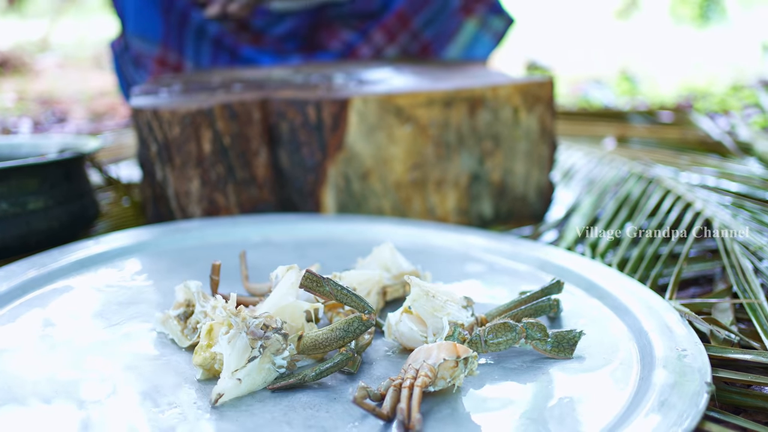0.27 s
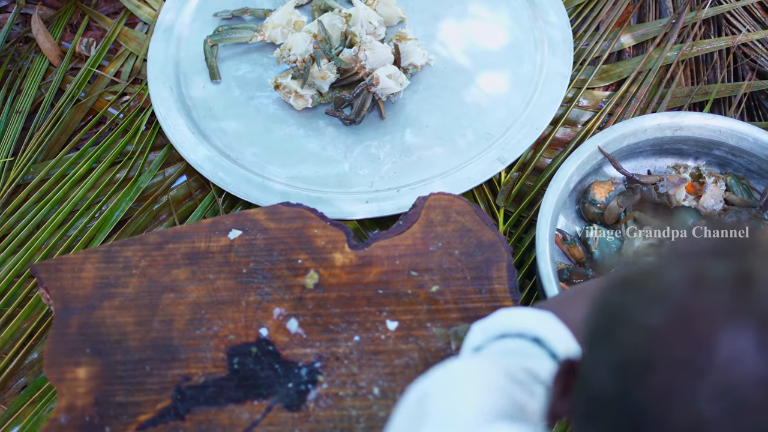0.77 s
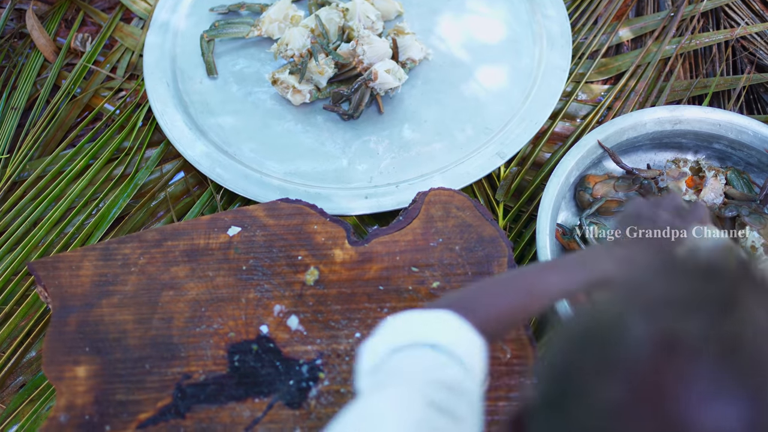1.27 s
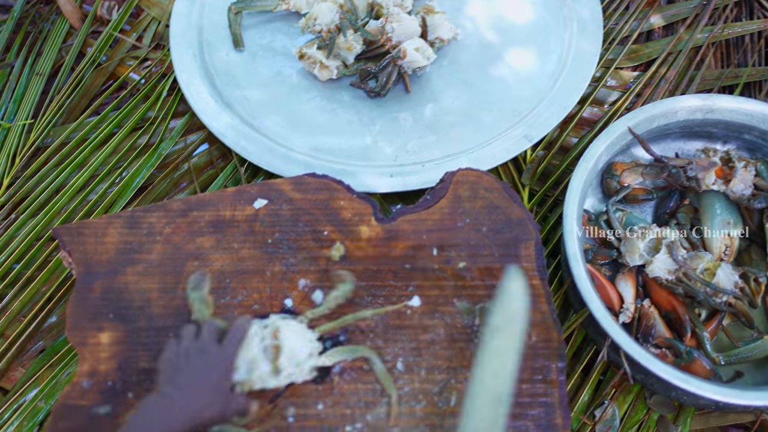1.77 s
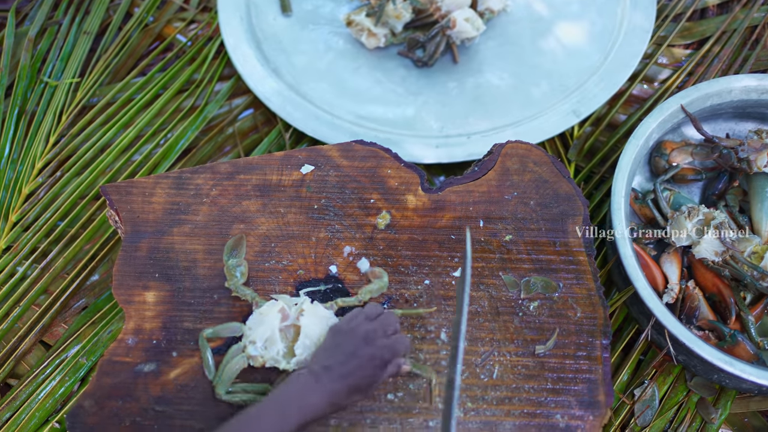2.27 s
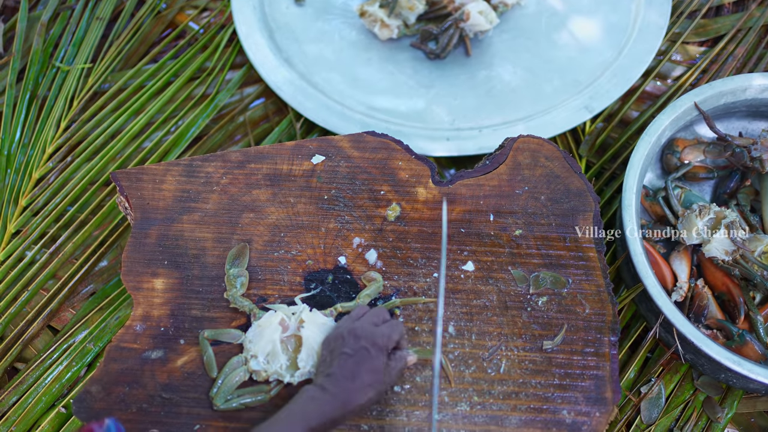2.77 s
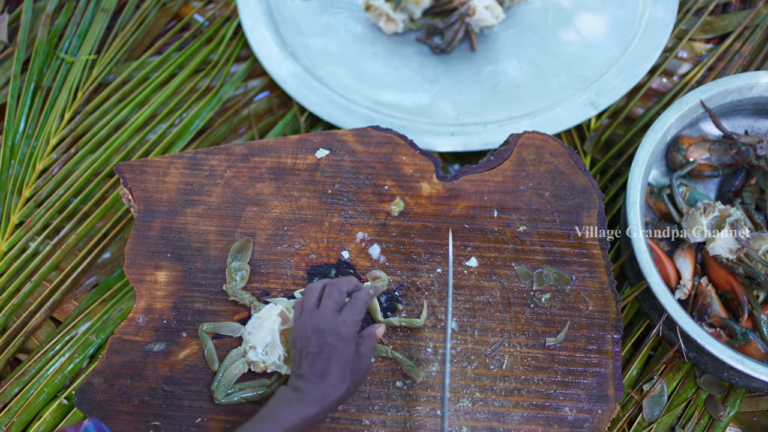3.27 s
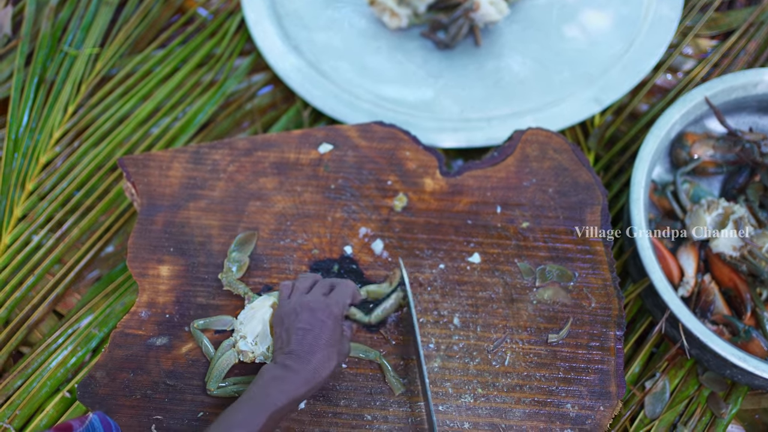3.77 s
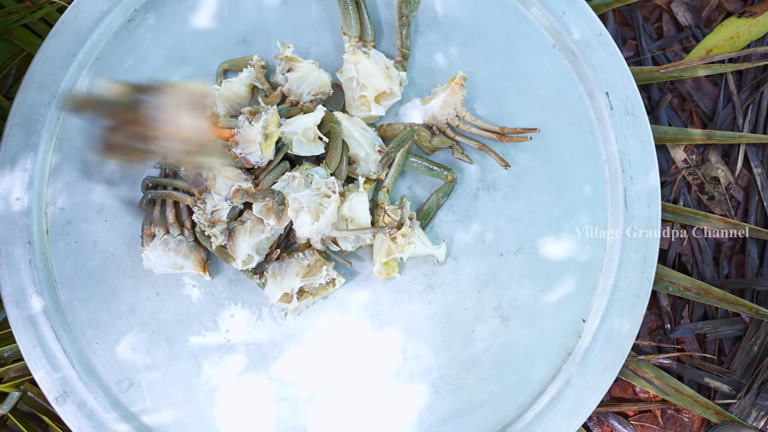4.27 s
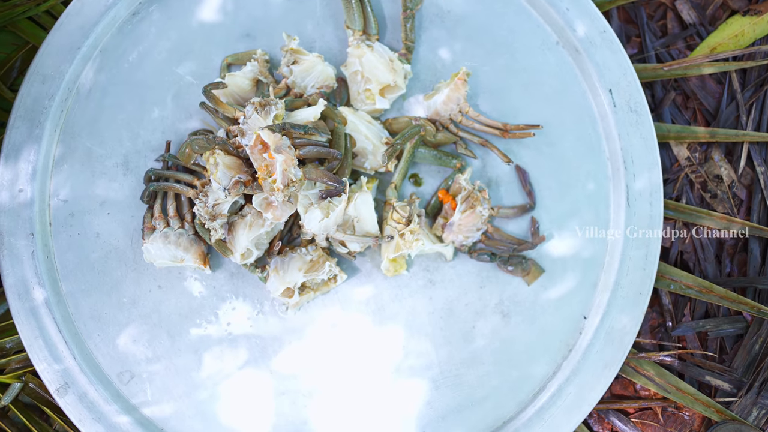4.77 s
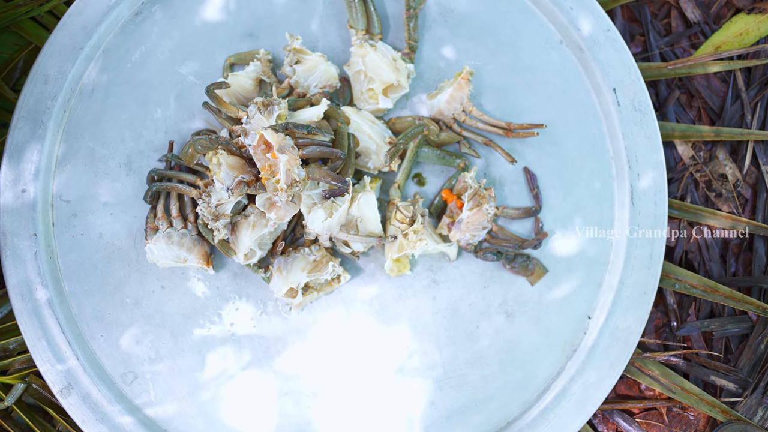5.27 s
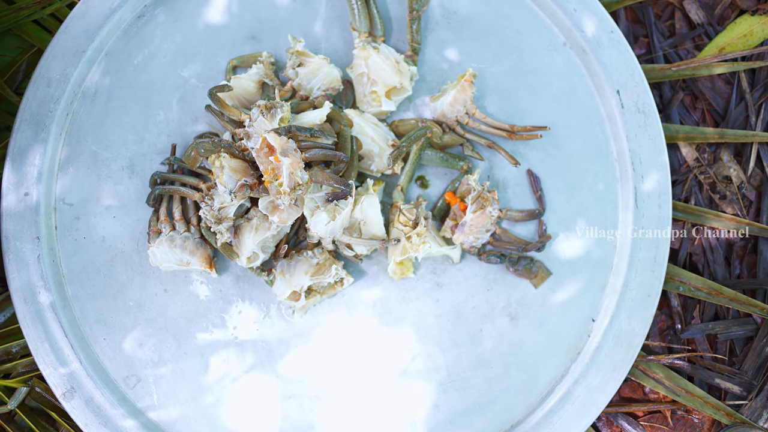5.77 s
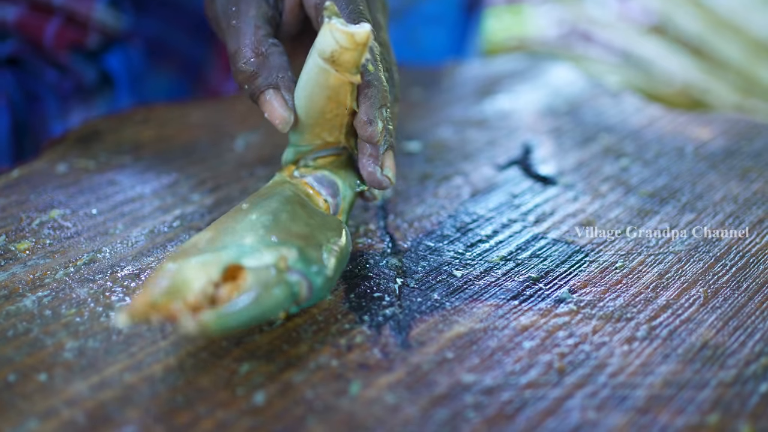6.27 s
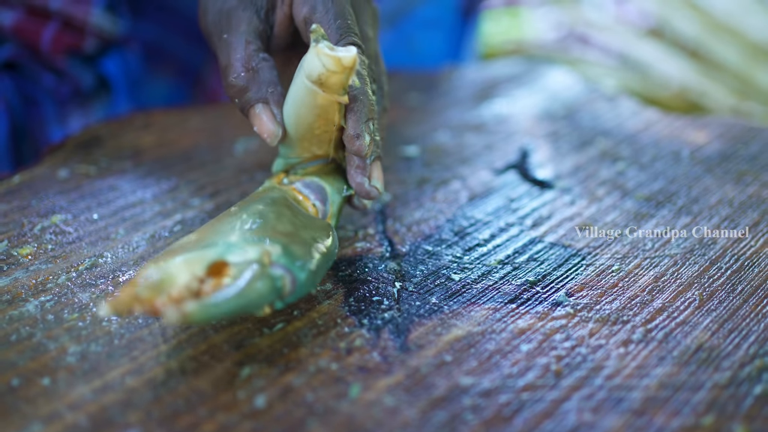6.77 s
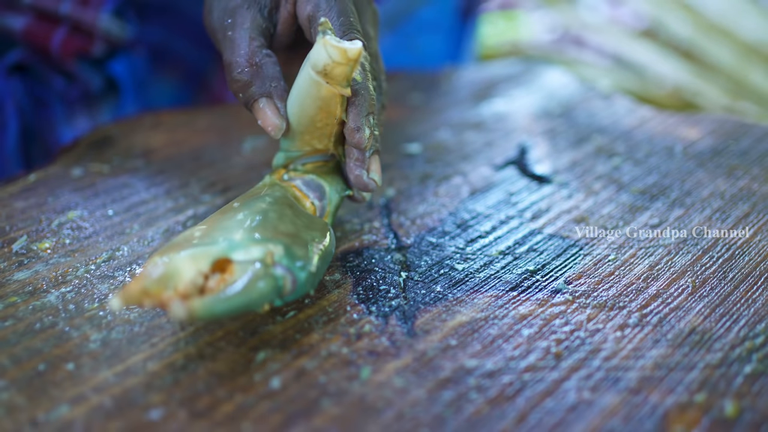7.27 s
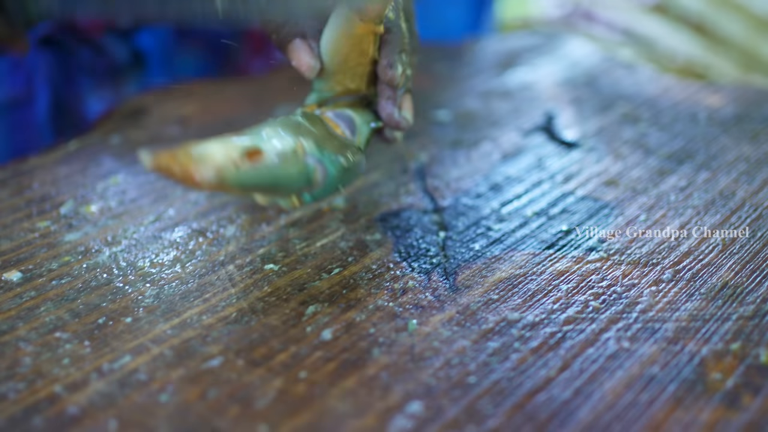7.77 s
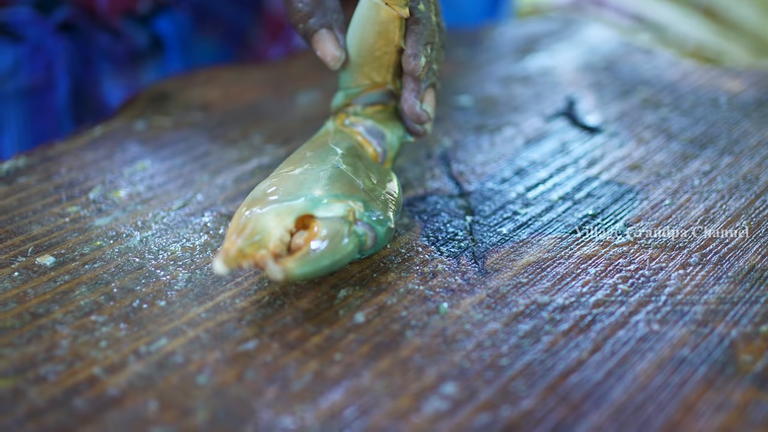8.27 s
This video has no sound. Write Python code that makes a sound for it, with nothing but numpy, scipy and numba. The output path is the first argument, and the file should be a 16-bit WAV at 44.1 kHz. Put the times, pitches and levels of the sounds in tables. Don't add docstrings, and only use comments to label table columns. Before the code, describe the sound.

Crab shells snap, knock and tumble onto a tray while sharp knife chops crack hard shell, echoing off trees in gusty open air.

```python
import sys
import numpy as np
from scipy import signal
from scipy.fft import rfft, irfft
from scipy.io import wavfile
from scipy.ndimage import uniform_filter1d
from numba import njit

SR = 44100
rng = np.random.default_rng(int(sys.argv[2]) if len(sys.argv) > 2 else 0)


def invert_db(x):
    u = np.asarray(x, float) / 20
    return 10 ** u


def dump(signal):
    limited = np.clip(np.atleast_2d(signal).T, -1, 1)
    pcm = np.round(limited * 32767).astype(np.int16)
    wavfile.write(sys.argv[1], SR, pcm)


N = 376173
T = np.arange(N) / SR


def unit(x):
    return x / np.sqrt(np.mean(x ** 2))


def colour(x, table):
    hz, db = np.transpose(table)
    f = np.maximum(np.fft.rfftfreq(len(x), 1 / SR), 1)
    gain = invert_db(np.interp(np.log(f), np.log(hz), db, -90, -90))
    return unit(irfft(rfft(x) * gain, len(x)))


def band(x, lo_hz, hi_hz):
    return signal.sosfilt(signal.butter(2, [lo_hz, min(hi_hz, .45 * SR)], "band", fs=SR, output="sos"), x)


def noise_band(lo_hz, hi_hz):
    return band(rng.standard_normal(N), lo_hz, hi_hz)


def walk(rate):
    k = int(SR / rate)
    held_levels = np.repeat(rng.standard_normal(N // k + 1), k)
    return unit(uniform_filter1d(uniform_filter1d(held_levels, k), k)[:N])


def steady(x, span_s):
    power = uniform_filter1d(x ** 2, int(span_s * SR))
    return unit(x / np.sqrt(power + .05 * np.mean(x ** 2)))


@njit
def add(out, s, hz, t60, size):
    for k in range(len(s)):
        start, z = int(s[k] * SR), size[k] + 0j
        p = np.exp(2j * np.pi * hz[k] / SR - np.log(1000) / (t60[k] * SR))
        for i in range(start, min(start + int(t60[k] * SR), len(out))):
            out[i] += z.imag
            z *= p


def rings(s, db, hz, t60, spread, smear_s, count):
    chance = rng.standard_normal((len(s), count, 3))
    chance[:, 0] = 0
    later, detune, sign = np.moveaxis(chance, 2, 0)
    weak = np.where(np.arange(count) > 0, 0.7 * np.sign(sign) / np.sqrt(count), 1)
    start_s = s[:, None] + smear_s * abs(later)
    pitch_hz = np.clip(hz[:, None] * np.exp(spread * detune), 50, .4 * SR)
    out = np.zeros(N)
    add(out, start_s.ravel(), pitch_hz.ravel(), np.repeat(t60, count), (invert_db(db)[:, None] * weak).ravel())
    return out


def grains(rate, lo_hz, hi_hz, cycles, scatter_db):
    s, pitch, size = rng.random((int(rate * N / SR), 3)).T
    hz, out = lo_hz * (hi_hz / lo_hz) ** pitch, np.zeros(N)
    add(out, s * N / SR, hz, cycles / hz, invert_db(-scatter_db * np.log(size + 1e-4)))
    return unit(out)


def resonate(x, dry_db, peaks):
    out = invert_db(dry_db) * x
    for hz, width, db in peaks:
        out = out + invert_db(db) * signal.lfilter(*signal.iirpeak(hz, hz / width, SR), x)
    return out


def hiss(table):
    return colour(rng.standard_normal(N), table) * invert_db(.4 * walk(2) + .4 * walk(15))


# start_s, hiss_level_db
SHOTS = [
    (0, -49.5),
    (.46, -49),
    (4.111, -43.5),
    (6.137, -40.5),
]
SHOT_START_S, HISS_DB = np.transpose(SHOTS)
SHOT = np.searchsorted(SHOT_START_S[1:], T)
# pitch_hz, level_db_per_hz
NEAR_LEAVES = [(120, 3), (200, 1), (329, -8.5), (368, -9.5), (468, -12), (552, -13), (702, -11),
               (1110, -10.5), (1200, -12.5), (1500, -10), (1670, -5.5), (2330, -12.5), (6200, -15),
               (10800, -28), (16500, -49.5)]
# pitch_hz, level_db_per_hz
FAR_WATER = [(120, -47.5), (200, -42), (300, -11.5), (426, -10.5), (522, -14), (652, -7.5), (702, -10.5),
             (860, -1.5), (1520, -0.5), (2210, -3), (4370, -3), (7740, -9), (9840, -16.5), (15000, -32.5),
             (16500, -50)]
# pitch_hz, level_db
MOTOR = [(107.7, -47), (161.5, -55.5), (209.9, -54)]
RUMBLE_DB = [-62, -81, -64.5, -59]


def field():
    motor = 0
    for hz, db in MOTOR:
        motor = motor + invert_db(db + 3.5 * walk(14)) * np.sqrt(2) * np.sin(2 * np.pi * hz * T)
    hum_hz, hum_db = 171.5, -60.5
    hum = invert_db(hum_db + 1.04 * walk(11)) * unit(noise_band(hum_hz - 9, hum_hz + 9)) * .7
    rumble = invert_db(np.array(RUMBLE_DB)[SHOT] + 1.57 * walk(2.02)) * unit(noise_band(89.5, 251))
    leaves = invert_db(HISS_DB[SHOT]) * np.where(SHOT < 2, hiss(NEAR_LEAVES), hiss(FAR_WATER))
    return leaves + rumble + np.where(SHOT == 0, motor, hum)


# loudest_s, mount_ring_db, buffeting_db, fade_20_db_s
GUSTS = [(.2, -46.5, -38, 0.6), (.61, -16.5, -20.5, 0.0851), (.85, -31, -38, .07), (1.09, -20, -25, 0.0729),
         (1.26, -17, -20.5, 0.11), (1.45, -31, -34, 0.08), (1.76, -25, -36, 0.14), (2.02, -34.5, -29, 0.23),
         (2.21, -35, -27.5, 0.29), (2.4, -25.5, -30, 0.1674), (2.52, -29.5, -24, 0.26),
         (2.62, -28.5, -31.5, 0.2864), (2.97, -31.5, -38, 0.07), (3.16, -22.5, -26.5, 0.0812),
         (3.35, -29, -45, 0.13), (4.1, -37, -37.5, 0.1548), (5.23, -41, -40.5, 0.09), (5.6, -52, -41, 0.53),
         (6.52, -37, -28, 0.2), (6.7, -31, -34, 0.1149), (6.98, -29, -34.5, 0.12), (7.27, -30, -29, 0.1361),
         (7.5, -44, -29, 0.2), (7.65, -31, -39, 0.03), (7.82, -27.5, -22.5, 0.2167),
         (8.05, -32, -30.5, 0.14), (8.32, -43, -44, 0.22), (8.52, -45, -33, 0.02)]


def gusts(peak_db, longer, calm_db):
    db = calm_db[SHOT]
    for (s, _, _, fade_s), peak in zip(GUSTS, peak_db):
        slope_s = longer * fade_s * np.where(T < s, 0.78, 1)
        db = np.maximum(db, peak - 20 * abs(T - s) / slope_s)
    return db


# mount_ring_db, buffeting_db
BREEZE_DB = [(-53.5, -49.5), (-45.5, -43), (-52.5, -45.5), (-48, -38.5)]
SWAY_DB = [-1, -1, 10, -1]


def wind():
    peaks, calm = np.transpose(GUSTS), np.transpose(BREEZE_DB)
    ring_db = gusts(peaks[1], 0.986, calm[0])
    buffet_db = gusts(peaks[2], 1.705, calm[1])
    ring_hz = 64 * (1 + .08 * walk(11))
    ring = np.sin(2 * np.pi * np.cumsum(ring_hz) / SR) * np.sqrt(2)
    share = np.clip((ring_db + 40) / 14, 0, .25) * (T < SHOT_START_S[2])
    mount = np.sqrt(share) * ring + np.sqrt(1 - share) * steady(noise_band(44, 72), .08)
    spray = invert_db(-27) * unit(noise_band(63, 206))
    buffet = invert_db(2.5 * walk(7.7)) * steady(noise_band(16, 40), .1)
    sway = invert_db(np.array(SWAY_DB)[SHOT] + 1.5 * walk(4)) * steady(noise_band(6, 16), .25)
    return invert_db(ring_db - 1.8) * (mount + spray) + invert_db(buffet_db - 7) * (buffet + sway)


# loudest_s, peak_db, pitch_hz, swell_s, fade_s
ROCKS = [
    (1.242, -11, 315, .014, .008),
    (1.273, -18, 400, .003, .006),
    (1.292, -22, 290, .01, .008),
    (1.3, -25, 200, .025, .02),
    (1.312, -23, 420, .002, .008),
]


def bowl():
    sag_per_s, upper_db = 4, -13
    out = np.zeros(N)
    for s, db, hz, swell_s, fade_s in ROCKS:
        on = slice(int((s - .05) * SR), int((s + .05) * SR))
        t = T[on] - s
        turn = 2 * np.pi * hz * t * (1 - sag_per_s * t)
        shape = np.exp(-(t / np.where(t < 0, swell_s, fade_s)) ** 2)
        out[on] += invert_db(db) * (np.cos(turn) + invert_db(upper_db) * np.cos(2.1 * turn)) * shape
    return out


# loudest_s, swell_s, settle_s, crackle_db, body_over_crackle_db
RUSTLE = [(.005, 0.00725, 0.0738, -22.5, 12), (.493, 0.0263, .04, -50, 26), (.64, 0.035, .12, -42, 7),
          (.715, .012, .04, -40, 6), (.762, .012, .015, -28, -10), (.976, .008, .012, -34, -5),
          (.77, 0.205, 0.196, -37.5, 5.5), (1, 0.07, 0.067, -39, 15), (1.059, .03, 0.169, -25, 4),
          (1.13, .01, .09, -38, 8), (1.198, .02, .015, -36, 8), (1.27, 0.03, 0.09, -55, 27),
          (1.62, 0.104, 0.156, -47, -6), (1.814, 0.0323, .16, -37, -7), (3.295, .02, .03, -42, -12),
          (3.33, .015, .14, -32, -19), (3.41, .03, .09, -43, -19), (4.384, .008, .1, -17, 0),
          (4.516, 0.0029, 0.0606, -33, 10), (4.392, .015, .02, -21, 6), (4.608, .004, .1, -29, 14),
          (4.67, .06, .11, -27, 12), (4.797, 0.00187, .05, -35, 12), (5.722, 0.0031, 0.08, -38, 8),
          (5.825, .06, 0.037, -36, 12), (5.869, 0.00216, .01, -30, -9), (5.889, 0.0114, 0.117, -41.5, 17.5),
          (5.98, .004, .03, -30, 0), (6.005, .01, .08, -27, 13), (6.075, .03, .04, -29, 15),
          (6.042, .01, .08, -28, 9), (6.1, .09, .07, -24, 11), (8.2, 0.1, 0.19, -44, 2)]
# pitch_hz, level_db_per_hz
CRACKLE = [(530, -49.5), (900, 1.5), (2350, -0.5), (4070, -1.5), (5070, -11), (5940, -8), (11000, -22),
           (15300, -42), (16500, -52)]


def rustle():
    bright = signal.lfilter([1, -.8], [1], grains(3000, 867.9, 17550, 38.6, 2.1))
    jolts_db = 4.2 * walk(160) + 1.2 * walk(35)
    grit = 0
    for hz in 850 * 1.5 ** np.arange(7):
        grit = grit + invert_db(jolts_db + 3.5 * walk(60)) * noise_band(hz, 1.5 * hz)
    crackle = steady(colour(1.15 * unit(bright) + unit(grit), CRACKLE), .03)
    body = steady(band(grains(500, 334.9, 1117.4, 27.2, 1.36), 308, 1490), .04)
    edge_db = 18
    out = np.zeros(N)
    for s, swell_s, settle_s, db, body_db in RUSTLE:
        on = slice(max(int((s - swell_s) * SR), 0), int((s + 1.4 * settle_s) * SR))
        shape_db = -edge_db * abs(T[on] - s) / np.where(T[on] < s, swell_s, settle_s)
        out[on] += invert_db(db + shape_db) * (invert_db(-2.5) * crackle[on] + invert_db(body_db - 10.5) * body[on])
    return out


# start_s, peak_db, pitch_hz
SNAPS = [(.6288, -28, 1230), (.6468, -29.5, 1313), (.7192, -24, 1367), (.8997, -30, 3180),
         (1.091, -18, 3600), (1.1088, -18, 3280), (1.1198, -17.5, 1534), (1.2036, -29, 1700),
         (3.3165, -23, 4100), (3.327, -21, 5200), (4.382, -16, 8500), (4.6225, -22, 5000), (4.7, -24, 7300),
         (1.066, -20, 3700), (1.13, -24, 4100), (5.9805, -27, 4400), (5.9808, -27, 5950),
         (6.041, -16, 5950), (6.097, -20, 5900), (1.6209, -38, 3510), (4.3852, -9, 3624),
         (4.3913, -6.5, 2785), (4.4034, -22, 1390), (4.4222, -15.5, 1503), (4.4369, -12, 3500),
         (4.634, -13, 1600), (4.649, -21.5, 5560), (4.6535, -14, 1670), (4.686, -14.5, 2856),
         (4.7167, -15, 1907), (4.7991, -21.5, 1158), (5.868, -15, 1700), (5.9796, -24.5, 1575),
         (6.005, -16, 1974), (6.028, -18, 4150), (6.0397, -5, 2704), (4.3805, -12, 3700),
         (7.8676, -4, 1050), (7.8969, -15, 3500), (7.8695, -14, 1500), (7.8715, -13, 3000),
         (1.8198, -19, 3800), (.707, -30, 1700), (.82, -31, 3500), (.857, -30, 1900), (5.8682, -17, 3300),
         (1.075, -22, 3500), (1.05, -24, 3600)]
# start_s, peak_db, pitch_hz
TAPS = [(0.0213, -11.5, 1282), (0.0427, -17, 1254), (.754, -24.5, 4260), (0.7626, -17.5, 3776),
        (1.0444, -22.5, 1480), (1.063, -14.5, 1242), (1.8196, -11.5, 2503), (2.529, -32, 2660),
        (3.3162, -5.5, 2074), (3.3268, -7, 1960), (3.3331, -15, 2066), (3.376, -33, 1340),
        (3.3948, -19, 1785), (3.4063, -27, 1546), (3.4898, -34, 2030), (4.5425, -11, 1210),
        (4.6055, -14.5, 1243), (4.6207, -14, 1150), (5.7226, -26.5, 1647), (5.824, -22.5, 1310),
        (6.0725, -27.5, 1190), (6.0963, -9, 2840), (6.1022, -11, 2270), (6.1095, -14, 1300),
        (6.124, -20, 1204), (3.3235, -17, 2050), (3.3395, -22, 2300), (4.525, -24, 2800),
        (4.539, -24, 2900), (1.848, -30, 2200), (8.2756, -27.5, 2010)]
# start_s, peak_db
FLICKS = [(.793, -37.5), (0.8194, -44.5), (0.8564, -33.5), (1.5862, -37), (1.607, -36), (2.6526, -33.5),
          (4.7, -32), (4.799, -34), (1.8205, -33), (1.187, -36), (6.6791, -25.5)]
TREBLE_DB = [-12, -24.5, 2]


def ticks():
    flick_hz = 1700
    kinds = [SNAPS, TAPS, [(s, db, flick_hz) for s, db in FLICKS]]
    s, db, hz = np.vstack(kinds).T
    top_db = np.repeat(TREBLE_DB, [len(rows) for rows in kinds])
    sharp = top_db > -15
    spike = rings(s, db - np.where(sharp, 2, 9), 1.78 * hz, 1.37 / hz, 0.324, 0.00046, count=3)
    ring = rings(s, db, hz, np.where(sharp, 11, 15) / hz + 0.004, 0.167, 0.0011702, count=7)
    top_hz = np.where(top_db > 0, 11000, 8500)
    top = rings(s, db + top_db + 5.5, top_hz, 0 * s + 0.0019, 0.248, .001, count=6)
    grit = invert_db(-36) * rng.standard_normal(1500) * np.exp(-T[:1500] / 0.01074)
    tail = band(signal.fftconvolve(ring + top, grit)[:N], 550, 14200)
    return band(band(spike + ring + top, 600, 13000), 600, 19000) + tail


# [(pitch_hz, width_hz, boost_db)]
HOLDERS = [
    (0, -5, [(1000, 300, -4), (1450, 300, -5), (1870, 300, -4), (3550, 450, -3), (4200, 350, -5), (5700, 700, -5), (7700, 900, -4), (12000, 5000, -5)]),
    (1.5, -10, [(1020, 300, 1), (1800, 300, -4), (2150, 400, -2), (2700, 400, -6), (4080, 250, -9), (5300, 900, -8), (11000, 5000, -4)]),
    (4.111, -4, [(1300, 500, -5), (2750, 350, -5), (3700, 450, -4), (5810, 500, -6), (7500, 700, -4), (12000, 5000, -4)]),
    (5.3, -5, [(1030, 300, -4), (1480, 250, -4), (1900, 300, -4), (2400, 300, -4), (2870, 350, -5), (4180, 450, -2), (5970, 350, -1), (11000, 5000, -6)]),
]


def held(x):
    edges_s = [s for s, _, _ in HOLDERS[1:]] + [SHOT_START_S[3], 6.3]
    parts = np.split(x, [int(s * SR) for s in edges_s])
    coloured = [resonate(p, db, peaks) for p, (_, db, peaks) in zip(parts, HOLDERS)]
    return np.concatenate(coloured + [0 * parts[-2], parts[-1]])


# start_s, peak_db, pitch_hz
SPIKES = [(1.0655, -8, 1300), (.9745, -26, 3300), (3.3158, -8, 1900), (3.3268, -11, 1700),
          (3.3338, -14, 1500), (3.4055, -20, 2400), (4.6065, -5, 900), (4.6222, -8, 1100),
          (4.6338, -9, 1800), (4.6542, -6, 1200), (4.6862, -8, 1500), (4.4545, -16, 1800),
          (5.8675, -7, 2000), (6.0962, -6, 2200), (6.1005, -7, 1500), (7.2398, -6, 1200),
          (1.8195, -12, 1600), (6.6793, -16, 600)]


def spikes():
    out = 0
    for bright, low_hz in enumerate([400, 800]):
        s, db, hz = np.transpose([row for row in SPIKES if (row[2] > 1450) == bright])
        swing = rings(s, db + 5, hz, 3.5 / hz, .1, 0, count=1)
        out = out + band(swing, low_hz, 12000)
    return out


# start_s, peak_db
TRAY = [(4.3875, -11), (4.4005, -4), (4.414, -7), (4.4257, -10), (4.4384, -6), (4.457, -6), (4.4965, -22.5),
        (4.5174, -18), (4.5429, -21), (4.6071, -5), (4.6226, -14.5), (4.6408, -18.5), (4.687, -.5),
        (4.6997, -4), (4.7164, -10), (4.7287, -12), (4.7777, -23.5)]
# start_s, peak_db, pitch_hz
HEAP = [(0.02, -8.5, 523), (.039, -11, 925), (.4749, -26, 420), (.4932, -16, 650), (.4945, -20, 420),
        (0.82, -22, 795), (0.9435, -16, 432), (1.0335, -4.5, 649), (1.041, -6, 440), (1.0659, -5, 646),
        (1.086, -13, 540), (1.13, -23, 426), (1.2039, -14, 380), (4.6065, -6, 700), (4.634, -9.5, 505),
        (4.6544, -3, 600), (4.7981, -10, 896), (5.7244, -19, 600), (5.74, -26, 630), (5.755, -26, 610),
        (5.77, -28, 650), (5.79, -27, 620), (5.808, -24, 650), (5.845, -26, 640), (5.885, -25, 640),
        (5.92, -29, 620), (5.8224, -14, 658), (5.867, -13, 1026), (5.8933, -22.5, 970), (5.9827, -19, 900),
        (5.9939, -23.5, 740), (6.004, -14.5, 471), (6.0465, -11.5, 400), (6.0748, -18, 560),
        (6.02, -17, 400), (6.064, -16, 380), (5.83, -24, 420), (5.87, -22, 400), (5.9, -26, 400),
        (6.1006, -11, 389), (6.1075, -8, 560), (6.1219, -14.5, 461)]
# start_s, peak_db, pitch_hz
BLOCK = [(8.1641, -25, 360), (8.1958, -24, 352), (1.8192, -10.5, 1088), (3.0096, -15, 497),
         (3.3156, -13, 1020), (3.327, -12, 1000), (3.394, -24, 1000), (7.703, -16, 1100), (3.7375, -3, 410),
         (7.128, -8, 1500), (3.334, -17, 1050), (3.7519, -14, 482), (6.68, -13, 347), (7.2399, -4, 620),
         (7.245, -6, 900), (3.011, -22, 1800), (7.8677, 2, 760), (7.8705, -7, 540), (7.696, -13, 420),
         (3.7385, -7, 560), (1.82, -24, 250), (6.6805, -20, 480), (7.9053, -25, 450)]
THIN_HZ = [185, 340, 620]
BRIGHT_HZ = [590, 990]


def knocks():
    tray_hz, contact_s = 310.9, .0004
    kinds = [[(s, db, tray_hz) for s, db in TRAY], HEAP, BLOCK]
    rows = np.vstack(kinds)
    traits = np.repeat([[13, 14, 6.5], [0, -3, -0.5]], [len(k) for k in kinds], axis=1)
    out = 0
    for bright, low_hz in enumerate(THIN_HZ):
        mine = np.searchsorted(BRIGHT_HZ, rows[:, 2]) == bright
        s, db, hz = rows[mine].T
        cycles, soft_db = traits[:, mine]
        contact = rings(s, db + soft_db - 1.5, 1.966 * hz, 2.34 / hz, .1, 0.00034, count=1)
        ring = rings(s, db - 4.5, hz, cycles / hz, 0.17, 0.002, count=4)
        rounded = signal.lfilter(*signal.butter(2, 1 / contact_s, fs=SR), contact + ring)
        out = out + band(band(rounded, low_hz, 9000), .92 * low_hz, 12000)
    return out * ((T < SHOT_START_S[3]) | (T > 6.3))


# start_s, level_db, pitch_hz, die_60_db_s
STEEL = [
    (2.992, -31, 4440, 0.22),
    (2.992, -37, 7725, 0.2),
    (3.74, -33, 1093, 0.247),
    (3.739, -47.5, 4810, .25),
    (3.74, -39, 6154, 0.21),
    (3.74, -41, 7730, 0.2),
]
# start_s, peak_db, pitch_hz, die_60_db_s
BLADE = [
    (1.642, -38, 2009, 0.122),
    (1.659, -40, 1932, 0.105),
    (3.866, -31, 1851, 0.06),
    (3.885, -32.5, 1863, 0.099),
    (3.899, -31.5, 1870, 0.104),
]


def blade():
    after_chops = rings(*np.transpose(STEEL), 0.0121, 0.029, count=4)
    return after_chops + rings(*np.transpose(BLADE), 0.0262, 0.001304, count=2)


# start_s, peak_db, block_thud_below_peak_db, echo_below_peak_db
CHOPS = [
    (2.987, -3.5, -9, -28),
    (3.7338, -4.5, -6, -28.5),
    (6.4326, -1.5, -39, -17.5),
    (7.127, -2, -30, -18),
    (7.6944, -1, -27, -22.5),
]
# pitch_hz, width_hz, level_db
CRACKS = [
    [(1510, 170, 0), (1960, 200, 0), (3760, 96, -8), (4460, 120, -9), (5820, 170, -11), (6910, 100, -12)],
    [(1040, 170, 0), (2190, 180, -9), (3780, 310, -12), (5640, 180, -18), (6170, 170, -20),
     (7600, 170, -17), (8260, 200, -22)],
    [(1510, 75, -10), (2000, 120, 0), (2700, 150, -5), (3590, 110, -4), (5370, 180, -13), (6310, 270, -16),
     (7470, 180, -10), (8000, 230, -19)],
    [(845, 260, -2), (2000, 120, -7), (2750, 140, 0), (3660, 110, -2), (4670, 270, -8), (7200, 150, -13),
     (7750, 82, -14), (8020, 130, -12)],
    [(738, 140, -1), (1880, 130, 0), (2940, 160, -1), (3300, 160, 0), (5860, 140, -8), (7100, 160, -16),
     (7710, 96, -12), (8310, 130, -8)],
]
# pitch_hz, level_db_per_hz
ECHO = [
    [(240, -29), (400, -5), (505, -4.5), (658, -13.5), (986, -2.5), (4530, -5.5), (12700, -22),
     (15500, -35), (16500, -59)],
    [(240, -55), (400, -24.5), (1210, -11), (1810, -6), (2320, -8.5), (4330, -1.5), (7820, -10),
     (13300, -27.5), (15700, -34), (16500, -65)],
]
ECHO_DELAY_S = [0.0435, 0.06306]
SWING_DB = [-39, -60]
THROUGH_S = [.0033, .0012]
CRACK_LOW_HZ = [170, 480]


def chops():
    out, t = np.zeros(N), T[:int(.6 * SR)]
    swing = int(.027 * SR)
    for (s, db, thud_db, echo_db), modes in zip(CHOPS, CRACKS):
        claw = int(s > 5)
        delay, noise = ECHO_DELAY_S[claw], rng.standard_normal((2, len(t)))
        hz, _, mode_db = np.transpose(modes)[..., None]
        since = t - THROUGH_S[claw] * (hz < 1200)
        tones = np.sin(2 * np.pi * (hz * t + rng.random(hz.shape)))
        sung = (invert_db(mode_db) * tones * (since > 0) * np.exp(-abs(since) / .0018)).sum(axis=0)
        splinter = unit(band(noise[0], 600, 9000) + .3 * noise[0])
        splinter = invert_db(.7) * splinter * np.exp(-(t / 0.0024) ** 2)
        blow = invert_db(db - 3.5) * np.tanh(3.2 * (sung + splinter))
        since = np.maximum(t - .0033, 0)
        block = invert_db(db + thud_db + 4) * np.sin(2 * np.pi * 330 * since) * np.exp(-since / 0.0022)
        early = 1.52 * np.exp(-t / 0.0075) * (1 - np.exp(-t / 0.00088))
        late = np.where(t < delay, np.exp(-((t - delay) / 0.032) ** 2), np.exp(-(t - delay) / 0.038))
        back = colour(noise[1] * invert_db(1.17 * walk(151)[:len(t)]), ECHO[claw])
        back = unit(resonate(back, -1, [(f, 220, d / 2 - 3) for f, _, d in modes]))
        echo = invert_db(db + echo_db) * back * (early + late + 0.3 * np.exp(-t / 0.138))
        i = int((s + 0.001002) * SR)
        crack = band(blow, CRACK_LOW_HZ[claw], 15500)
        out[i:i + len(t)] += band(crack + block, 170, 19000) + echo
        brush = colour(noise[0, -swing:], ECHO[0]) * np.linspace(.7, 1.6, swing)
        out[i - swing:i] += invert_db(db + SWING_DB[claw]) * brush
    return out


def scene():
    background = field() + wind()
    shells = bowl() + held(rustle() + ticks()) + spikes() + knocks()
    return (background + shells + blade() + chops())[None]


def band_limit(x):
    return signal.sosfilt(signal.butter(12, 16830, fs=SR, output="sos"), x)


def record(dry):
    dry = band(dry, 9, 19000)
    top_cut = signal.butter(8, 16400, fs=SR, output="sos")
    mix = np.clip(signal.sosfilt(top_cut, dry), -.72, .72)
    return band_limit(mix)


dry = scene()
out = record(dry)
dump(out)
```